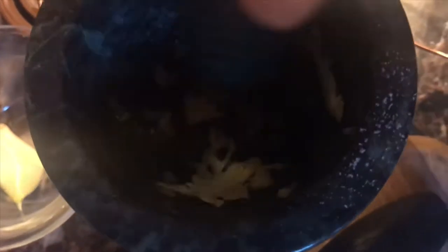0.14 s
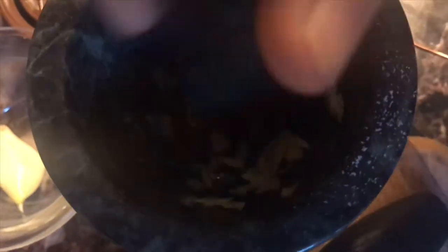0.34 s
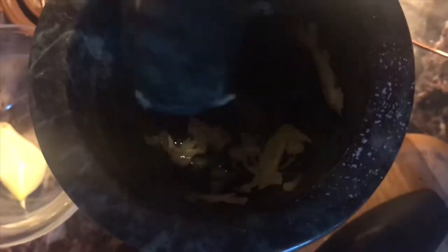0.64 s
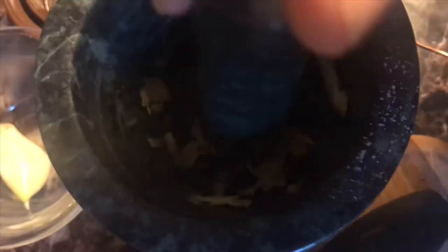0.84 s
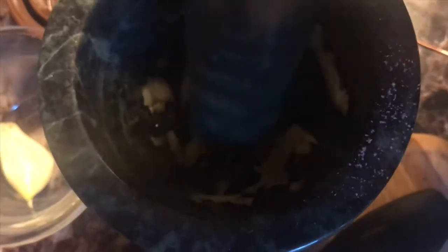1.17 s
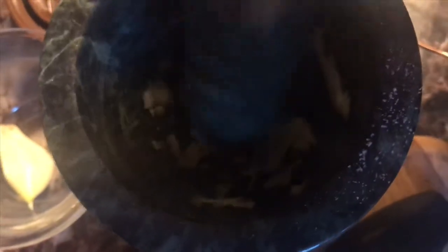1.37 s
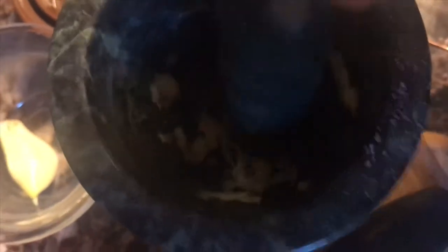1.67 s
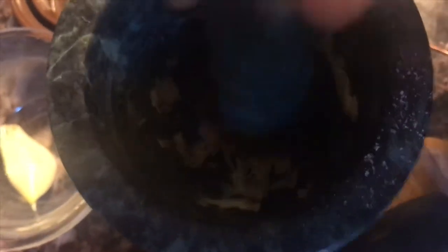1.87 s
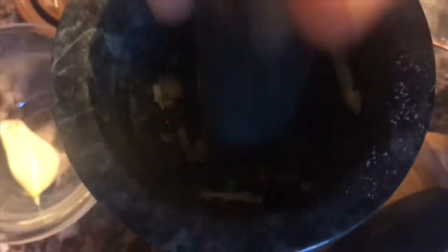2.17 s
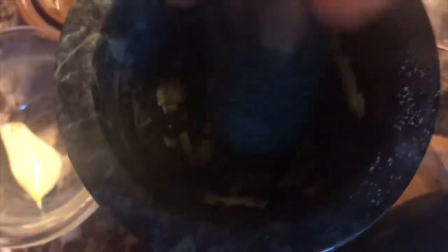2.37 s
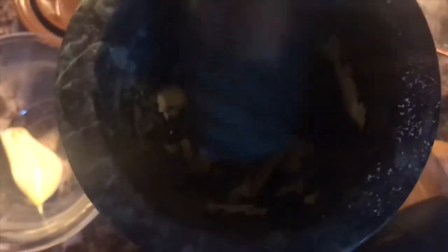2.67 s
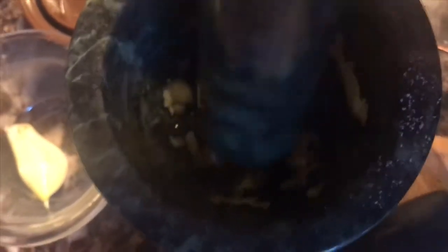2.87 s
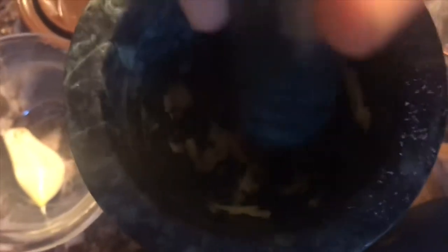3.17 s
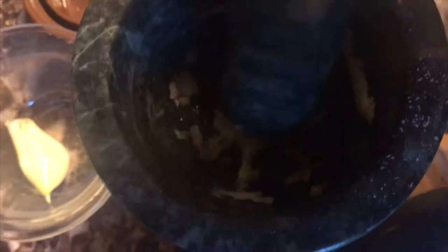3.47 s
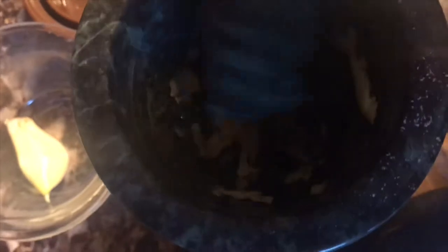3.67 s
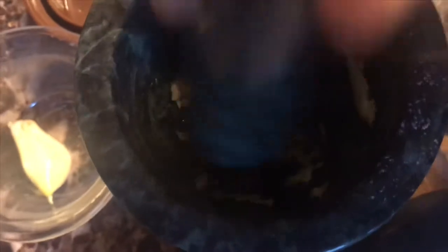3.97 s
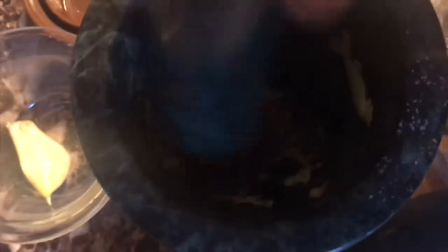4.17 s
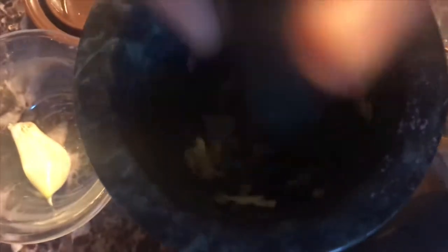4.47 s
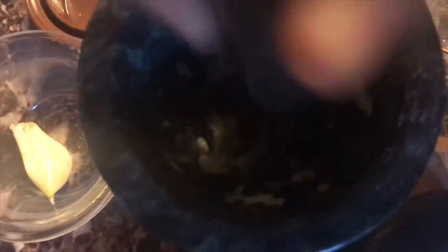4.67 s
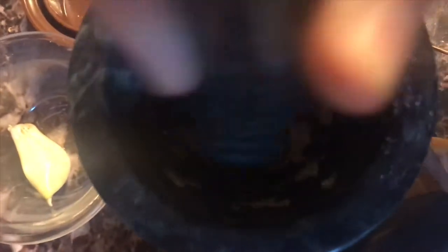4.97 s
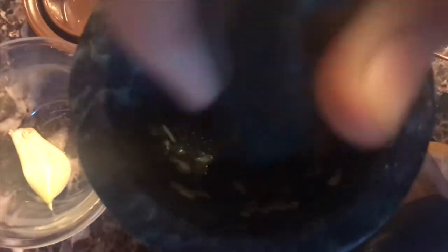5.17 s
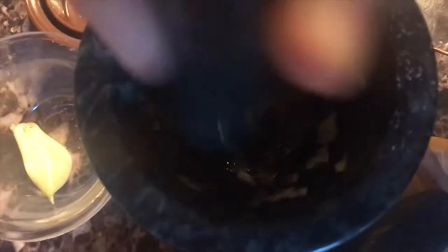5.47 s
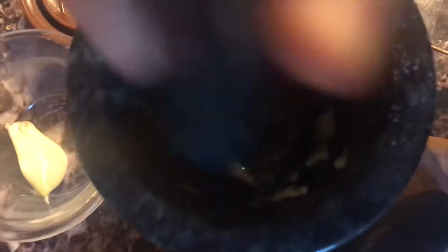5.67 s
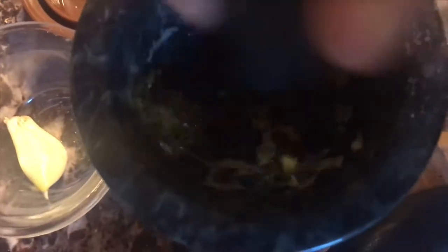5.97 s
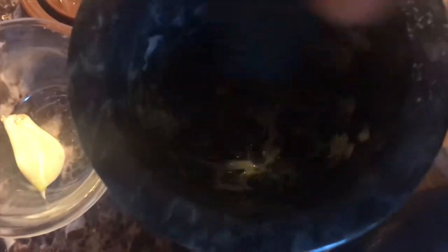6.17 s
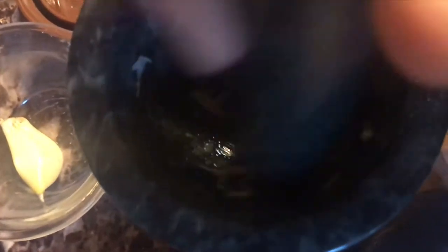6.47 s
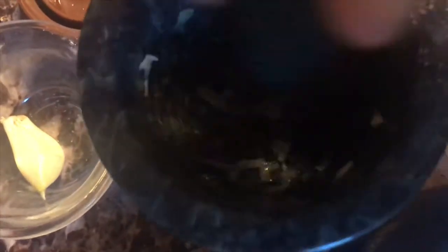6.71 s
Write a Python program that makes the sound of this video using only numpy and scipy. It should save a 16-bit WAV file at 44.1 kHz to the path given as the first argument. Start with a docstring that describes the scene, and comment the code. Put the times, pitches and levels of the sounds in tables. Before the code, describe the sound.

Recorded very close in a small kitchen over a soft low appliance drone. From 0 to 0.6 seconds a stone pestle rubs salt in a stone mortar, with short sandy hisses, small knocks and one hard clack near 0.2. A brief gap follows. From 0.9 to 4.1 seconds come sixteen steady downward blows, about every 0.2 seconds: a hollow stone knock, a low counter thud and a crisp salt crunch. The blows near 0.9, 2.0 and 3.6 are hardest and clackiest; the crunch is strongest around 2.8 to 3.4. A glass and dish ring barely audibly after heavy blows. From 4.3 to the end near 6.8 the pestle grinds: gritty hissing sweeps, low rumble, rough scrapes, sharp crystal ticks around 5.1 and 6.0, and irregular wall knocks, strongest at 5.2 to 5.7, with another clack near 6.2.

```python
"""Pestle and mortar on a kitchen counter

A stone pestle pounds garlic and salt in a stone mortar, close to a phone microphone in a small room.
Each blow is decaying noise for the knock and the crushed salt, and decaying sines for bowl and counter.
Before and after the pounding the pestle grinds: random snaps shake counter and bowl, patchy noise hisses
as salt. A glass and a dish ring faintly nearby, an appliance drones in the room, and the microphone input
saturates softly; the treble ends steeply near 16 kHz.
"""
import sys
import numpy as np
from scipy import signal
from scipy.fft import rfft, irfft, next_fast_len
from scipy.io import wavfile
from scipy.ndimage import uniform_filter1d, map_coordinates

SR = 44100
rng = np.random.default_rng(int(sys.argv[2]) if len(sys.argv) > 2 else 0)


def store_wav(level_fs):
    """Save 16-bit WAV to argv[1]."""
    pcm = np.round(np.clip(np.atleast_2d(level_fs), -1, 1) * 32767)
    wavfile.write(sys.argv[1], SR, pcm.T.astype(np.int16))


N = 301644  # samples
SILENT_DB = -90


def amp(db):
    """Gain of a level in dB."""
    return 10 ** (np.asarray(db) / 20)


def unit(x):
    """x at rms 1."""
    return x / np.sqrt(np.mean(x ** 2) + 1e-20)


def along(points, hz):
    """(f/Hz, value) points interpolated on a log frequency axis."""
    f, v = np.transpose(points)
    return np.interp(np.log(hz + 1), np.log(f + 1), v)


def wobble(rate):
    """A smooth random curve, rate knots a second."""
    knots = rng.standard_normal(int(N * rate / SR) + 4)
    return map_coordinates(knots, [np.arange(N) * rate / SR])


def coloured(x, spectrum):
    """x through a (f/Hz, level/dB) spectrum."""
    m = next_fast_len(len(x) + 8192)
    gain = amp(along(spectrum, np.fft.rfftfreq(m, 1 / SR)))
    return irfft(rfft(x, m) * gain, m)[:len(x)]


def coloured_noise(spectrum):
    """Steady noise of a given spectrum, rms 1."""
    return unit(coloured(rng.standard_normal(N), spectrum))


def add(track, s, sound):
    """Mixes a sound into a track at s seconds."""
    part = track[round(s * SR):][:len(sound)]
    part += sound[:len(part)]


def ring(modes, rise, scatter_db, detune=0.):
    """One answer of an object to a blow: decaying sines, peak 1, each mode scattered in level and pitch."""
    t = np.arange(SR // 2) / SR
    hz, db, t60 = np.transpose(modes)[:, :, None]
    level_luck, pitch_luck = rng.standard_normal((2, len(modes), 1))
    fade = amp(db + scatter_db * level_luck - 60 * t / t60)
    partials = fade * np.sin(2 * np.pi * hz * (1 + detune * pitch_luck) * t)
    out = partials.sum(0) * (1 - np.exp(-t / rise))
    return out / np.abs(out).max()


def chattered(modes, rise, t60):
    """Rough stone faces keep touching for a few ms, which smears the modes with decaying noise; peak 1."""
    t = np.arange(SR // 16) / SR
    touches = rng.standard_normal(len(t)) * amp(-60 * t / t60)
    out = signal.fftconvolve(ring(modes, rise, scatter_db=2.5, detune=0.018), touches)
    return out / np.abs(out).max()


def burst(t60, lumpy_db):
    """A sudden envelope that dies unevenly, its level redrawn every 32 samples."""
    t = np.arange(SR // 8) / SR
    lumps = np.repeat(rng.standard_normal(len(t) // 32 + 1), 32)[:len(t)]
    return amp(-60 * t / t60 + lumpy_db * lumps)


# downward blows: t/s, time to squash the paste/s, relative crush level/dB, knock level/dB, clack level/dB,
# thud level/dB, share of the thud at first touch (0-1)
POUNDS = [(0.907, 0.001, -22.5, 3, -13.5, -10, 0.2), (1.143, 0.0097, -19, -21.5, -53, -15, 0.91),
          (1.335, 0.013, -14, -14.5, -41, -16, 0.15), (1.558, 0.0072, -7, -19.5, -30, -14.5, 0.14),
          (1.767, 0, -8, -5.5, -44, -11, 0.48), (1.968, 0.0019, -15.5, 3, -9.5, -7.5, 0.42),
          (2.194, 0.013, -17, -19, -40, -17, 0.17), (2.384, 0.0081, -6.5, -22, -31.5, -13, 0.63),
          (2.591, 0.0096, -7.5, -13, -31, -11.5, 0.77), (2.805, 0.0031, -2.5, -5, -23, -8, 0.48),
          (3.019, 0.0011, -6, -2.5, -10, -11, 0.48), (3.229, 0.0018, 0.5, -4.5, -23, -8.5, 0.65),
          (3.433, 0, -5, -1.5, -13.5, -12.5, 0.36), (3.639, 0.00082, -13, 2, -9.5, -10.5, 0.37),
          (3.9, 0.015, -9.5, -20, -34, -12, 0.42), (4.088, .019, -16.5, -19.5, -42, -14, 0.49)]
# pestle strikes or grazes the wall: t/s, relative knock level/dB, clack level/dB, thud level/dB
WALL_HITS = [(0.007, -21, -35, -21), (0.177, -2.5, -2.5, -15.5), (0.086, -32.5, -39, -39),
             (0.28, -49, -42, -34), (0.319, -30, -38, -38), (0.375, -29, -55, -22),
             (0.394, -12.5, -42, -25.5), (0.497, -20, -19, -24.5), (0.54, -34.5, -58, -37),
             (0.885, -30, -53, -43), (1.946, -38, -46, -43), (4.29, -41, -42, -34), (4.305, -44, -50, -27),
             (4.336, -31.5, -52, -25.5), (4.366, -22.5, -34.5, -30), (4.532, -47, -48, -32),
             (4.549, -19.5, -52, -20), (4.611, -39, -39, -28), (4.727, -12, -20.5, -18.5),
             (4.863, -37, -37, -28), (4.936, -33, -50, -26), (4.973, -21.5, -36, -30),
             (4.985, -32, -30.5, -34.5), (5.108, -51, -53, -32.5), (5.188, -11, -12.5, -33),
             (5.292, -41, -51, -28), (5.343, -5, -9.5, -24.5), (5.514, -3, -8, -27),
             (5.522, -39, -11, -22.5), (5.587, -24, -51, -30.5), (5.699, -1, -3.5, -20.5),
             (5.792, -47, -51, -30.5), (5.894, -30, -30, -35.5), (5.945, -20, -25, -31.5),
             (6.027, -32, -58, -26), (6.139, -27, -47, -32), (6.161, -14.5, -31, -23),
             (6.174, -14, -5.5, -34), (6.225, -32, -54, -26.5), (6.36, -27, -35, -48),
             (6.377, -21, -39, -26.5), (6.412, -26, -53, -21), (6.514, -18, -26, -32),
             (6.545, -27, -31, -32.5), (6.577, -29, -40, -24.5), (6.601, -34, -48, -23),
             (6.745, -22.5, -34.5, -21.5), (6.774, -28, -50, -23.5)]
TOUCH_DB = -33.5  # knock of the first touch on the paste, relative
REBOUND_S, REBOUND_KNOCK_DB = 0.048, -29.5  # the bowl lands again
REBOUND_THUD_DB = -18  # under the thud of the blow
KNOCK_T60, WALL_KNOCK_T60 = 0.072, 0.051  # s: after a blow, and after a drier knock on the wall


def contacts():
    """A blow touches paste, reaches stone, rebounds: rows of t/s, knock, clack, thud level/dB, knock t60/s."""
    rows = [(*row, WALL_KNOCK_T60) for row in WALL_HITS]
    for s, squash, _, knock_db, clack_db, thud_db, early in POUNDS:
        shares = np.clip([early, 1 - early], .01, 1)
        early_db, late_db = thud_db + 20 * np.log10(shares)
        rebound_db = thud_db + REBOUND_THUD_DB
        rows += [(s, TOUCH_DB, clack_db, early_db, KNOCK_T60),
                 (s + squash, knock_db, SILENT_DB, late_db, KNOCK_T60),
                 (s + REBOUND_S, REBOUND_KNOCK_DB, SILENT_DB, rebound_db, WALL_KNOCK_T60)]
    return rows


# bowl knocking on its foot, spectrum: f/Hz, relative level/dB
KNOCK_SPECTRUM = [(210, -12.5), (350, -3.5), (457, -3), (653, -5.5), (1380, -4.5), (1840, -12.5),
                  (2030, -17.5), (2680, -17.5), (3130, -25.5), (3580, -27.5), (5000, -39), (6500, -63),
                  (11000, -120)]


def bowl_knocks():
    """The bowl knocks on its foot: decaying noise in the colour of the stone."""
    shape = np.zeros(N)
    for s, knock_db, _, _, t60 in contacts():
        add(shape, s, amp(knock_db - 7.0) * burst(t60, lumpy_db=3.5))
    shape = uniform_filter1d(shape, size=40, origin=19)  # contact builds up over a millisecond
    return shape * coloured_noise(KNOCK_SPECTRUM)


# wall modes of the bowl: f/Hz, relative level/dB, t60/s
BOWL_MODES = [(2720, -6, 0.045), (2995, 23, 0.0087), (3380, -8, 0.066)]


def clacks():
    """Stone clacks on stone: the wall modes of the bowl, smeared by chatter."""
    out = np.zeros(N)
    for s, _, clack_db, _, _ in contacts():
        add(out, s, amp(clack_db + 1.5) * chattered(BOWL_MODES, 0.0001, 0.0067))
    return out


# counter, a faint long low mode, eight quick modes, then three weak lingering ones:
# f/Hz, relative level/dB, t60/s
COUNTER_MODES = [(61.9, -22, 0.45), (94.3, 1, 0.077), (138, -11, 0.015), (171.8, 10, 0.044),
                 (235.3, -11.5, 0.11), (261.1, 6.5, 0.058), (422.2, -8.5, 0.074), (562, -2.5, 0.036),
                 (683.6, -14, 0.068), (105.9, -13, 0.29), (162.6, -14.5, 0.23), (260.4, -23, 0.27)]


def counter_thuds():
    """The counter thuds in its low modes; being heavy, it yields a moment after the stone speaks."""
    out = np.zeros(N)
    for s, _, _, thud_db, _ in contacts():
        thud = ring(COUNTER_MODES, 0.006, scatter_db=3.0, detune=0.079)
        add(out, s + 0.0018, amp(thud_db + 9.5) * thud)
    return out


# salt crushed by the pestle, spectrum: f/Hz, relative level/dB
CRUNCH_SPECTRUM = [(1470, -74.5), (2500, -18), (4810, -4), (6900, 3.5), (9570, 3.5), (10400, 1.5),
                   (14800, 4), (15800, -2), (16900, -23)]
CRUSH_T60, SQUASH_STRETCH = 0.016, 2.13  # s; t60 grows by this many times the squash time
WALL_CRUSH_DB = -30.5  # salt caught against the wall, relative to the clack column


def crushes():
    """A bright burst of noise as many crystals break at once."""
    shape = np.zeros(N)
    for s, squash, crush_db, *_ in POUNDS:
        t60 = CRUSH_T60 + SQUASH_STRETCH * squash
        add(shape, s, amp(crush_db - 13.5) * burst(t60, lumpy_db=2.0))
    for s, _, clack_db, _ in WALL_HITS:
        add(shape, s, amp(clack_db + WALL_CRUSH_DB) * burst(CRUSH_T60, lumpy_db=-0.5))
    return shape * coloured_noise(CRUNCH_SPECTRUM)


# two close pairs of high bowl modes: f/Hz, relative level/dB, t60/s
RIM_MODES = [(5270, -2, .03), (5370, 0, .04), (7690, -1, .03), (7810, 0, .04)]
# rim set ringing: t/s, lower pair level/dB, upper pair level/dB
RINGS = [(0.0094, -50, -40), (0.176, -20.5, -37), (0.9063, -35, -21.5), (1.969, -28, -22),
         (4.416, -39.5, -53), (4.6443, -44, -36), (5.187, -35, -38), (5.3423, -53, -43), (5.5134, -52, -41),
         (5.7004, -26, -31), (5.895, -40, -41), (5.9445, -33, -51), (6.1744, -14.5, -32),
         (6.3585, -38, -43), (6.5141, -50, -36), (6.637, -37, -50)]


def rim():
    """The rim rings in two pairs of high modes, smeared by chatter, each pair at its own strength."""
    out = np.zeros(N)
    for s, *levels_db in RINGS:
        for pair, db in zip(np.split(np.array(RIM_MODES), 2), levels_db):
            add(out, s, amp(db) * chattered(pair, 0.00023, 0.032))
    return out


# steady rubbing while the pestle turns, one list per bout: t/s, relative hiss level/dB,
# rumble level/dB, scrape level/dB
GRIND = [
    [(0, -50.5, -34.5, -42), (.194, -51.5, -42.5, -52.5), (.326, -47.5, -39, -37), (.38, -58, -35, -71),
     (.502, -51, -50, -64), (.58, -73, -51, -60)],
    [(4.288, -58, -40, -58), (4.41, -49.5, -38, -51), (4.52, -48, -43, -54.5), (4.9, -48.5, -35.5, -51),
     (5.3, -48.5, -35, -55), (5.4, -47.5, -30.5, -37.5), (5.56, -48, -31.5, -36.5), (5.62, -48, -38, -50.5),
     (5.69, -51, -25, -32.5), (5.76, -50.5, -34.5, -52), (6.16, -48, -35.5, -52), (6.35, -54, -40.5, -51),
     (6.53, -49.5, -35, -48), (6.84, -45.5, -37, -45)],
]


def rubbing():
    """Gains of hiss, rumble and scrape: the steady rubbing of each bout, silent outside it."""
    t = np.arange(N) / SR
    total = np.zeros((3, N))
    for bout in GRIND:
        s, *levels_db = np.transpose(bout)
        total += amp([np.interp(t, s, db, left=SILENT_DB, right=SILENT_DB) for db in levels_db])
    return total


# sweeps through the salt: start t/s, length/s, relative hiss level/dB
STROKES = [(0.082, 0.012, -49), (0.115, .06, -37), (0.324, 0.037, -40.5), (0.42, 0.014, -44),
           (.46, 0.034, -45), (0.523, .012, -42), (4.289, 0.073, -44), (4.46, .048, -53),
           (4.58, 0.048, -42), (4.705, 0.036, -46), (4.792, 0.023, -48), (4.867, 0.062, -40.5),
           (5.023, 0.075, -41), (5.11, .045, -44), (5.22, 0.071, -42.5), (5.317, .02, -44),
           (5.398, 0.024, -50), (5.57, 0.044, -47), (5.78, 0.042, -40), (5.854, 0.056, -44),
           (5.979, 0.062, -45), (6.2, 0.022, -40), (6.255, 0.016, -41), (6.389, 0.047, -40),
           (6.483, 0.049, -49), (6.569, 0.069, -43.5), (6.66, 0.018, -50), (6.726, .037, -46),
           (6.806, 0.021, -47)]
SWELL_S, FADE_S = 0.0048, .015  # time for 20 dB of rise or fall


def sweeps():
    """Gain of the hiss in the sweeps: rise, hold, fade."""
    t = np.arange(N) / SR
    total = np.zeros(N)
    for s, length, db in STROKES:
        outside = np.maximum((s - t) / SWELL_S, (t - s - length) / FADE_S)
        total += amp(db - 20 * np.maximum(0, outside))
    return total


def grit(rate, spread_db):
    """Random snaps, rate a second on average, with an exponential spread of level; rms 1."""
    snaps = (rng.random(N) < rate / SR) * rng.standard_normal(N)
    return unit(snaps * amp(spread_db * rng.exponential(size=N)))


def shaken(modes, rise, rate):
    """An object kept ringing by the snaps of stick-slip, rms 1."""
    snaps = grit(rate, spread_db=-0.16)
    return unit(signal.fftconvolve(snaps, ring(modes, rise, scatter_db=0.0))[:N])


def patchy(x, depth_db):
    """x with small patches of random gain in time and frequency."""
    z = signal.stft(x, nperseg=128)[2]
    field = uniform_filter1d(rng.standard_normal(z.shape), size=9, axis=0)
    field = uniform_filter1d(field, size=8, axis=1)
    return signal.istft(z * amp(depth_db * unit(field)), nperseg=128)[1][:N]


# loose salt, spectrum: f/Hz, relative level/dB
SALT_SPECTRUM = [(1470, -41.5), (2500, -21), (2660, 1), (4720, -5.5), (6040, 5), (8050, 3.5), (9040, 6),
                 (10200, 3), (12100, 5), (15900, 4)]
RIM_RUB_DB = -10  # mean level of the rubbed rim, relative to the hiss column


def grinding():
    """Stick-slip of the turning pestle shakes counter and bowl; salt hisses under it."""
    hiss, rumble, scrape = rubbing()
    # only the eight quick counter modes
    rumble = rumble * amp(1 + 2.8 * wobble(24)) * shaken(COUNTER_MODES[1:-3], 0.014, 90)
    rasp = unit(coloured(grit(1800, spread_db=2.5), KNOCK_SPECTRUM))
    rasp = rasp + amp(-16) * shaken(BOWL_MODES, 0.00019, 400)
    scrape = scrape * amp(1 + 4 * wobble(45)) * rasp
    grains = rng.standard_normal(N) + 1.06 * grit(2500, spread_db=1.4)
    grains = unit(coloured(patchy(grains, depth_db=3.5), SALT_SPECTRUM))
    flutter_db = 1.5 * wobble(70) + 2.6 * wobble(200)
    salt = (amp(1.5) * hiss + sweeps()) * amp(flutter_db) * grains
    rubbed_rim = hiss * amp(RIM_RUB_DB + 5.5 * wobble(14)) * shaken(RIM_MODES, 0.0012, 170)
    return rumble + scrape + salt + rubbed_rim


# salt crystals that crack or unstick on their own: t/s, relative level/dB
CRACKS = [(1.3945, -27), (1.6157, -20), (1.808, -35), (2.2535, -26), (2.4215, -32), (2.6435, -33),
          (2.8684, -28.5), (3.055, -27), (3.0727, -27), (3.289, -29), (3.486, -21), (3.6908, -25),
          (3.9526, -24.5), (4.138, -26.5), (4.178, -36), (4.2903, -16.5), (4.337, -28), (4.467, -20),
          (4.684, -23), (4.808, -13), (4.9132, -27), (5.033, -19), (5.0669, -9), (5.2252, -17),
          (5.4887, -18.5), (5.674, -20), (5.821, -24), (6.019, -11), (6.2576, -18.5), (6.3135, -18.5),
          (6.3947, -17), (6.5873, -18), (6.603, -23)]


def cracks():
    """A sharp tick of salt noise trailed by a faint crackle of wet paste."""
    shape = np.zeros(N)
    for s, db in CRACKS:
        tick = burst(0.011, lumpy_db=0.0)
        crackle = amp(-14) * burst(0.041, lumpy_db=11.5)
        add(shape, s, amp(db - 12.0) * (tick + crackle))
    return shape * coloured_noise(SALT_SPECTRUM)


# modes of a nearby glass: f/Hz, relative level/dB, t60/s
GLASS_MODES = [(9810, 0, .25), (14620, -12, .15), (15300, -5, .3)]
# glass touched: t/s, peak level/dB
RATTLES = [(.925, -57), (1.985, -49), (3.04, -51)]


def glass():
    """A nearby glass rings in thin high modes, just after three of the blows."""
    out = np.zeros(N)
    for s, db in RATTLES:
        add(out, s, amp(db) * ring(GLASS_MODES, 0.0098, scatter_db=2))
    return out


# mode of a dish on the counter: f/Hz, relative level/dB, t60/s
DISH_MODES = [(3030, 0, .5)]


def dish():
    """A dish on the counter sings faintly; its level climbs 3 dB per dB of thud, so heavy blows wake it."""
    out = np.zeros(N)
    for s, *_, thud_db, _ in POUNDS:
        add(out, s, amp(3 * thud_db - 27) * ring(DISH_MODES, .01, scatter_db=0))
    return out


# answer of the small room: f/Hz, t60/s, relative level/dB
KITCHEN = [(100, 0.22, 3), (1040, 0.44, -7.5), (3030, 0.29, -5), (6060, 0.14, 6), (12100, .1, -7.5)]


def kitchen(x):
    """Each frequency of the room's answer dies at its own speed; the tail is new every quarter second."""
    out, step = np.zeros(N), SR // 4
    hz, t60, db = np.transpose(KITCHEN)
    for start in range(0, N, step):
        f, t, z = signal.stft(rng.standard_normal(SR // 2), SR, nperseg=256)
        fade = np.interp(f, hz, db)[:, None] - 60 * t / np.interp(f, hz, t60)[:, None]
        tail = signal.istft(z * amp(fade), SR, nperseg=256)[1]
        add(out, start / SR + 0.0048, signal.fftconvolve(x[start:start + step], tail))
    return out


# room tone spectrum: f/Hz, relative level/dB
AIR_SPECTRUM = [(15, -57), (25, 12), (58, 1.5), (87, 5.5), (120, 13), (160, 1.5), (372, -10), (751, -8.5),
                (860, -7.5), (1260, -13.5), (3500, -20), (3800, -21), (4840, -24.5), (15900, -31.5)]
AIR_DB = -46  # level around which the tone drifts


def room_tone():
    """Soft broad noise with the drone of an appliance in its bass, drifting slowly in level."""
    drift_db = wobble(2.93)
    return amp(AIR_DB + drift_db) * coloured_noise(AIR_SPECTRUM)


def scene():
    """Everything is heard directly; blows, rim, cracks, glass, dish and counter also echo in the room."""
    stone = bowl_knocks() + clacks() + rim()
    near = stone + crushes() + cracks() + glass() + dish()
    counter = counter_thuds()
    echoes = amp(-43.5) * kitchen(near) + amp(-48.5) * kitchen(counter)
    return (near + counter + grinding() + echoes + room_tone())[None]


# upper edge of the sound's band: f/Hz, level/dB
BAND_EDGE = [(15650, 0), (16150, -34)]
TOP_HZ = 17000  # nothing passes from here up


def record(dry):
    """The input loses deep bass and saturates softly near full scale; the treble ends steeply near 16 kHz."""
    thin = signal.sosfilt(signal.butter(3, 36, "highpass", fs=SR, output="sos"), dry)
    soft = thin / (1 + np.abs(thin / .98) ** 8) ** (1 / 8)
    m = next_fast_len(N + 8192)
    hz = np.fft.rfftfreq(m, 1 / SR)
    gain = amp(along(BAND_EDGE, hz)) * (hz < TOP_HZ)
    return irfft(rfft(soft, m) * gain, m)[:, :N]


dry = scene()
out = record(dry)
store_wav(out)
```